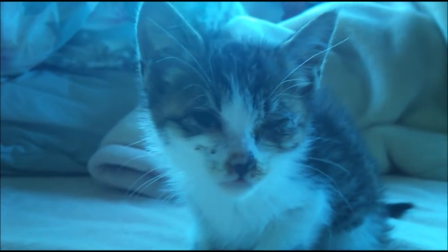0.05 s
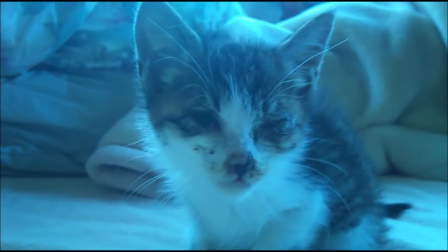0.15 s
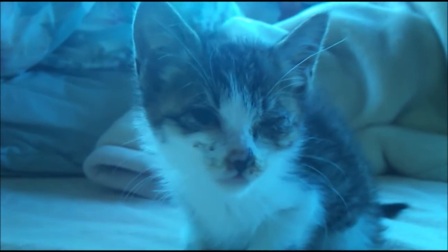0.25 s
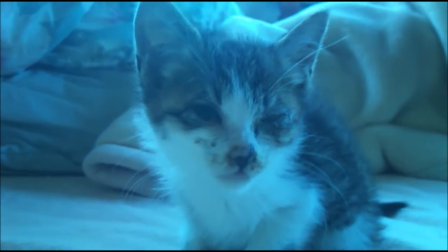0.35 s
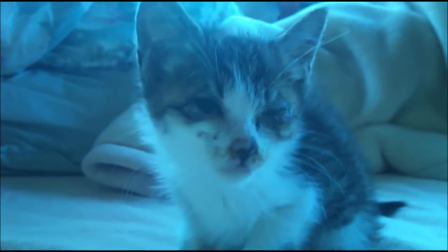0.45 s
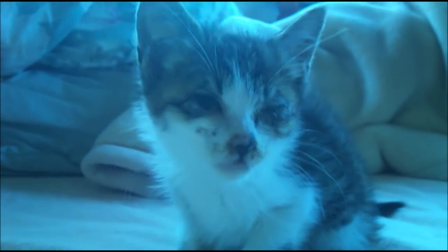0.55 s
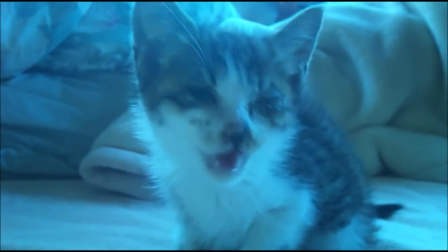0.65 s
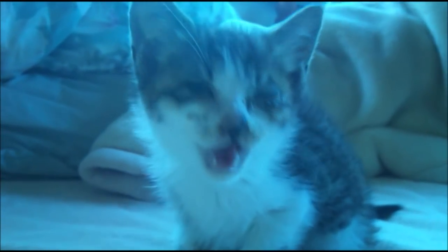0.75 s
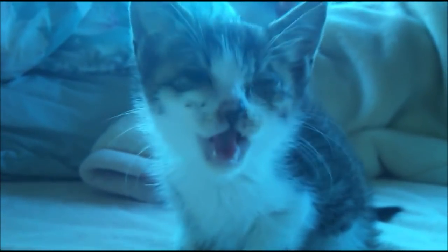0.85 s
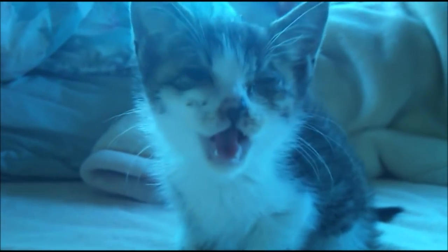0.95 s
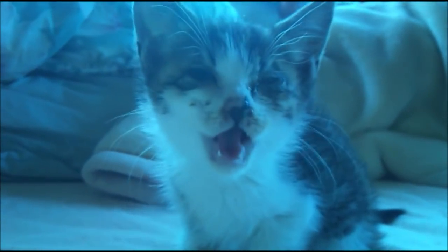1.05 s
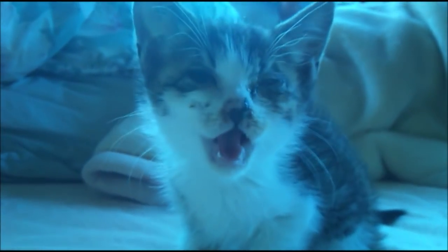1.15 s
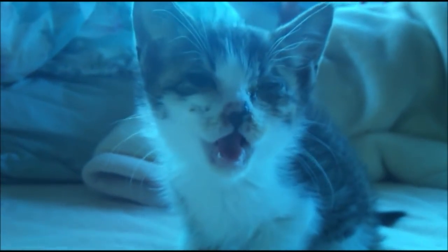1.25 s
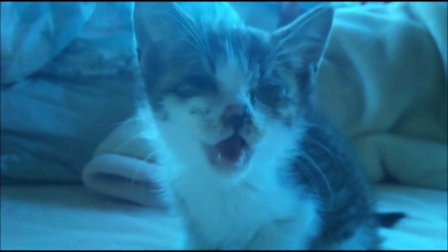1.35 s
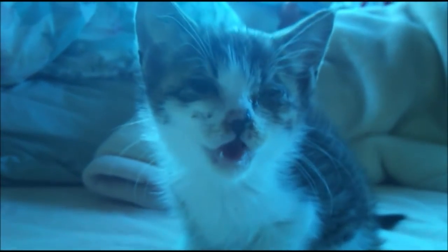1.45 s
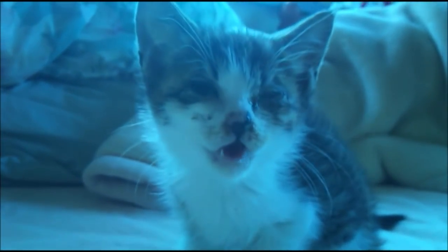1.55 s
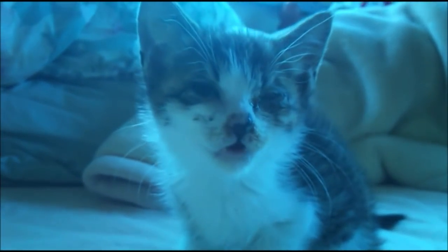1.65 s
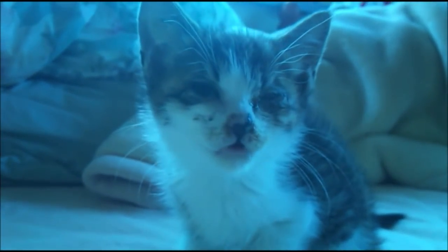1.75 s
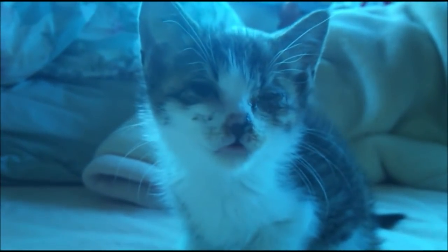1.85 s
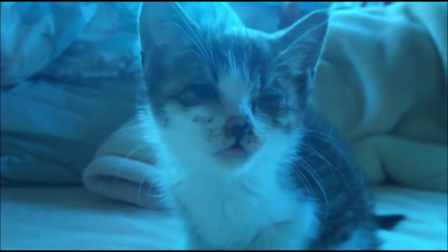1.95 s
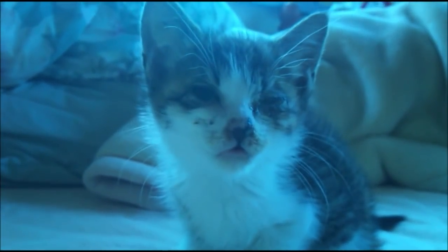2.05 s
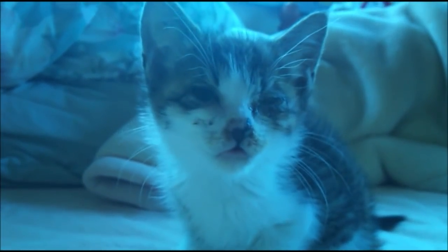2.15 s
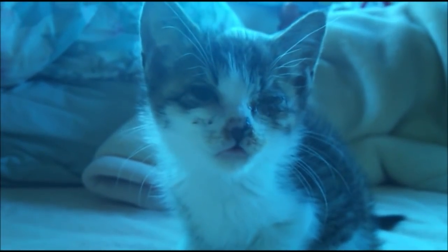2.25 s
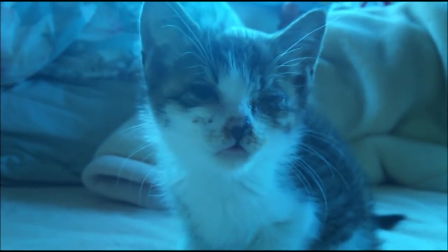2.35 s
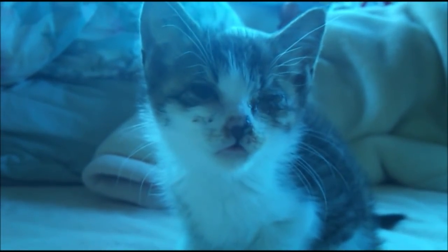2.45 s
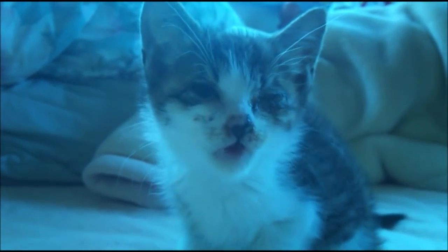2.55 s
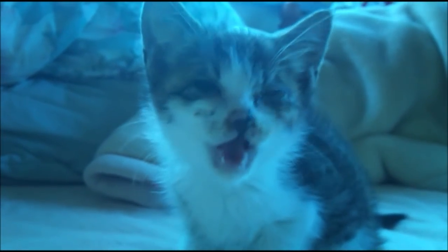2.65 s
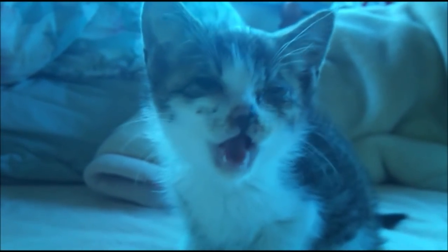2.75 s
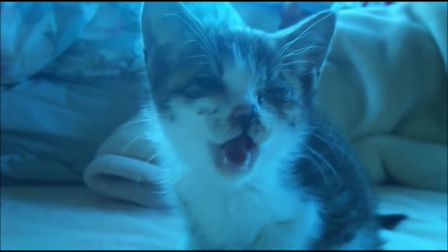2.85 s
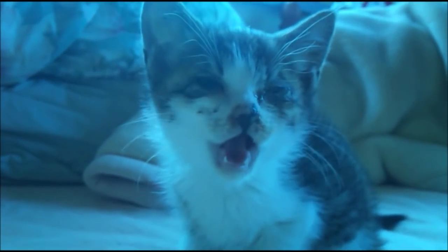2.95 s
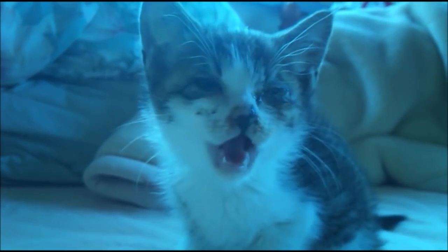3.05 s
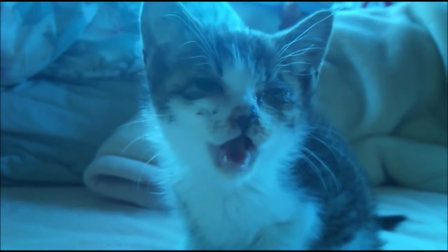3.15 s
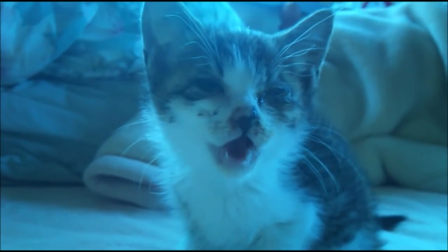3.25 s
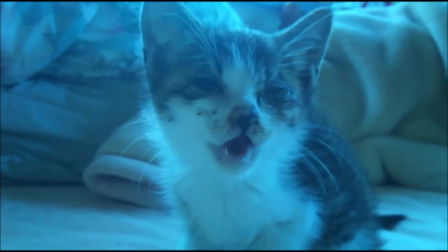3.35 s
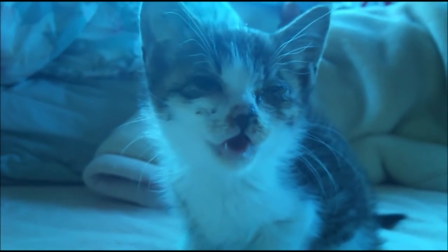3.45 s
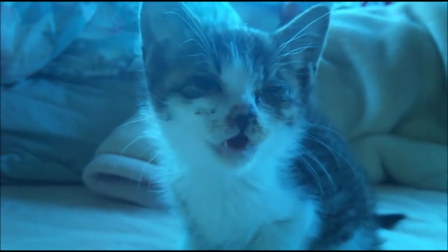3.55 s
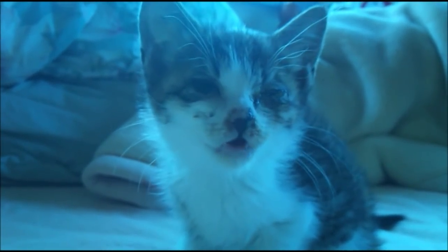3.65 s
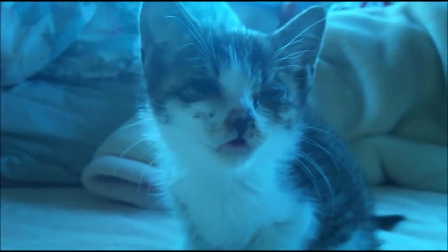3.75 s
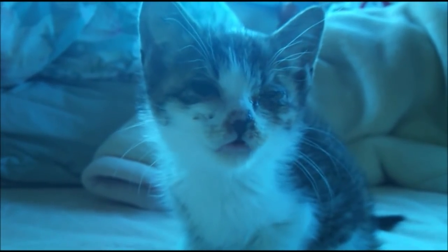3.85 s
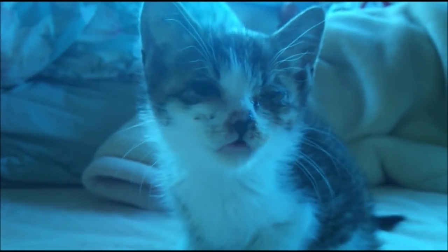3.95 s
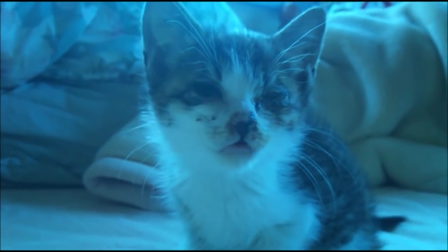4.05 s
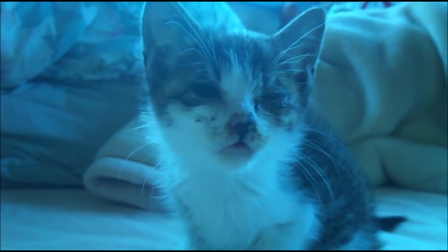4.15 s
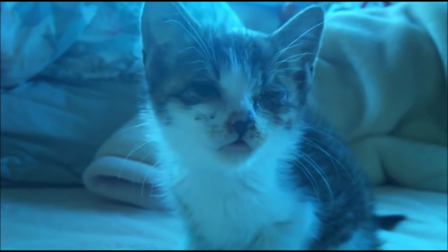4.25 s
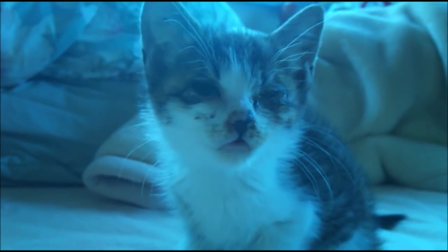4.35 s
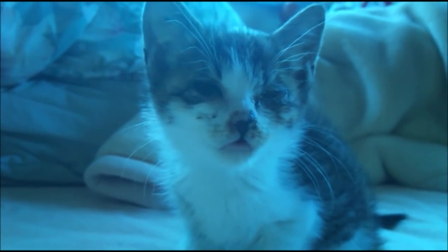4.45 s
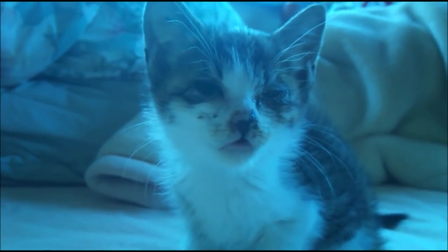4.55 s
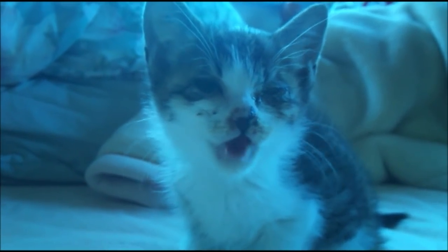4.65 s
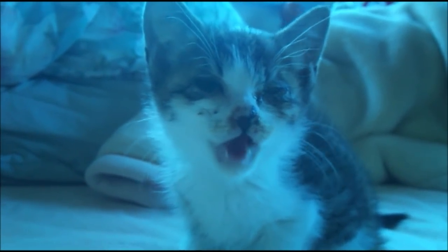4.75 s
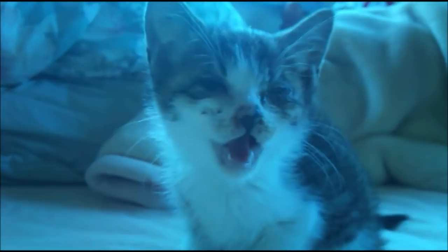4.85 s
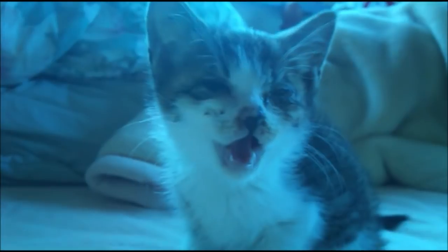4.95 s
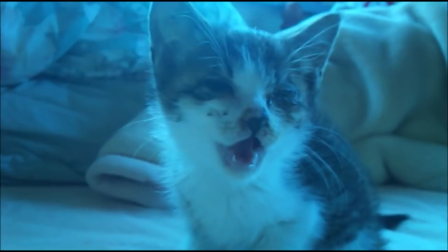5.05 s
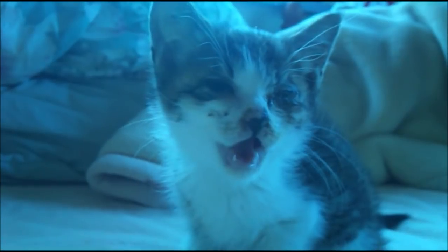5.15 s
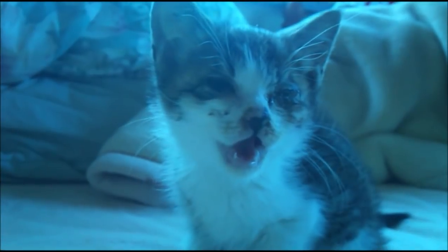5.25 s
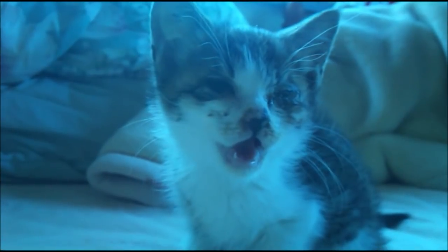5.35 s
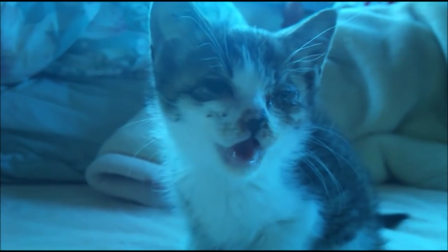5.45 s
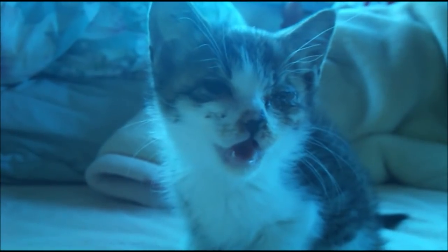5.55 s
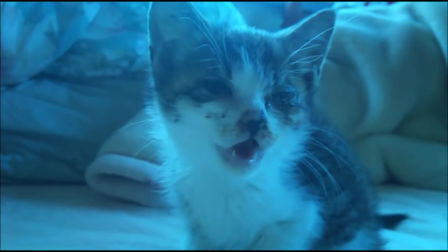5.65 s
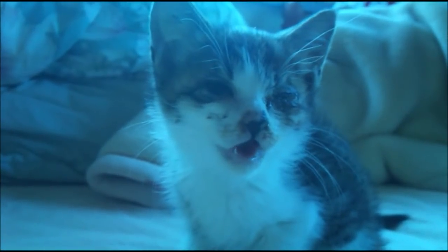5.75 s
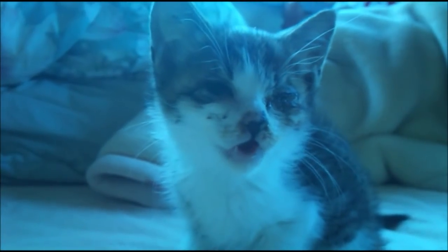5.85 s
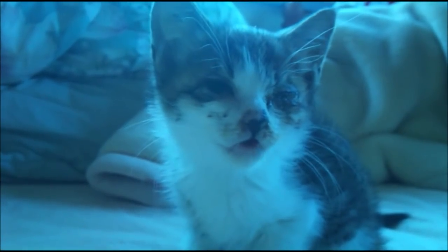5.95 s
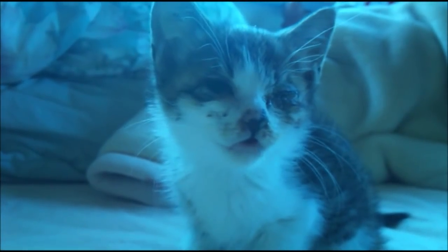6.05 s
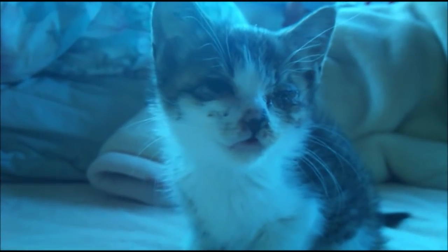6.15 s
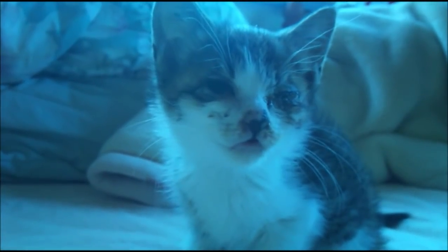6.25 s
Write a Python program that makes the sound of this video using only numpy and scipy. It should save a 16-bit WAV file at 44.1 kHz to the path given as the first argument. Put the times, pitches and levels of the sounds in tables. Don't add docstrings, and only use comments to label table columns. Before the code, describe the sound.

A young kitten close by gives three thin, drawn-out mews with long pauses, each cracking and flicking upward at its end, in a quiet room.

```python
import sys
import numpy as np
from scipy import signal
from scipy.fft import rfft, irfft
from scipy.io import wavfile
from scipy.ndimage import uniform_filter1d

SR = 44100
rng = np.random.default_rng(int(sys.argv[2]) if len(sys.argv) > 2 else 0)


def invert_db(level):
    return 10 ** (np.asarray(level, dtype=float) / 20)


def master(y):
    cut = np.clip(np.atleast_2d(y).T, -1, 1)
    pcm = np.round(cut * 32767)
    wavfile.write(sys.argv[1], SR, pcm.astype(np.int16))


N = 277389
STEP = 32

# (frequency [Hz], level [dB])
NOISE_COLOUR = [(18, -31.5), (30, -0.5), (64, -3), (382, -3), (941, -9.5), (1060, -8.5), (2430, -11.5),
                (3430, -14.5), (6720, -13), (7540, -22), (9800, -49), (16600, -120)]
# (frequency [Hz], level [dB rms])
LOW_HUM = [(42, -87.5)]
HISS_DB = -72


def hiss():
    hz, level_db = np.transpose(NOISE_COLOUR)
    bins_hz = np.arange(N // 2 + 1) * SR / N
    colour = invert_db(np.interp(np.log(bins_hz + 1), np.log(hz), level_db))
    noise = irfft(colour * rfft(rng.standard_normal(N)), N)
    t = np.arange(N) / SR
    hum = sum(invert_db(db + 3.5) * np.sin(2 * np.pi * hz * t) for hz, db in LOW_HUM)
    return invert_db(HISS_DB) * noise / noise.std() + hum


# (time [s], peak level [dB], frequency [Hz], decay by 60 dB [s])
CLICKS = [(.796, -54.5, 1310, .035), (1.7405, -51, 3600, .0052), (2.739, -55, 1295, .02),
          (4.106, -55.5, 864, .018), (4.731, -49.5, 1500, .013), (4.7313, -55, 2210, .0067),
          (4.7335, -37.5, 750, .0067), (4.808, -56.5, 984, .02), (4.817, -56, 3400, .02),
          (5.249, -52, 880, .022), (5.955, -54, 3800, .0071), (5.986, -48.5, 3600, .0065)]


def smacks():
    out, t = np.zeros(N), np.arange(2000) / SR
    onset = 1 - np.exp(-t / 0.00024)
    for s, peak_db, hz, t60 in CLICKS:
        at = round(s * SR)
        out[at:at + len(t)] += invert_db(peak_db - 60 * t / t60) * np.sin(2 * np.pi * hz * t) * onset
    return out


def drift(rate, size):
    r = np.exp(-2 * np.pi * rate * STEP / SR)
    chance = rng.standard_normal((size, N // STEP + 1001))
    slow = signal.lfilter([1], [1, -2 * r, r * r], chance)[:, 1000:]
    return slow / slow.std(axis=1, keepdims=True)


def in_steps(rows):
    s, *columns = np.transpose(rows)
    return [np.interp(np.arange(N // STEP + 1) * STEP / SR, s, c) for c in columns]


def in_samples(steps):
    return np.interp(np.arange(N) / STEP, np.arange(len(steps)), steps)


# (start time [s], attack [s], mouth ring level [dB], jaw slack [0-1])
STARTS = [
    (.797, 0.016, -1.5, 0.18),
    (2.734, 0.015, 8, 0.24),
    (4.812, 0.012, 0.5, 0.02),
]
# (time [s], pitch [Hz])
HELD_PITCH = [
    [(.812, 520), (.83, 517.3), (.888, 553.7), (.964, 567.5), (1.1, 555.1), (1.342, 555.3), (1.455, 566),
     (1.602, 546.4), (1.64, 546.6)],
    [(2.754, 413.2), (2.77, 461.5), (2.808, 473.5), (2.822, 511.3), (2.875, 542), (3.254, 545.1),
     (3.335, 557.7), (3.524, 534.4), (3.72, 565.4)],
    [(4.835, 473.7), (4.847, 507.6), (4.881, 504), (4.977, 542.4), (5.065, 561.8), (5.315, 572.8),
     (5.557, 549.5), (5.7, 546.3), (5.87, 556)],
]
# (time [s], level [dB], mouth opening [0-1], throat [Hz], mouth [Hz])
HELD_1 = [(0.82, -50.5, .1, 1039, 3470), (0.859, -49, .7, 1030, 3480), (.93, -47.5, 1, 1530, 3410),
          (1.02, -46, 1.09, 1520, 3310), (1.16, -47, 0.98, 1307, 3430), (1.27, -47.5, 0.97, 1273, 3370),
          (1.421, -49, 0.58, 1427, 3310), (1.57, -49.5, 0.16, 1239, 3140), (1.645, -50.5, .05, 1230, 3250)]
HELD_2 = [(2.762, -48.5, 0.65, 1230, 3350), (2.806, -42.5, 0.42, 1433, 3530),
          (2.822, -44.5, 0.46, 1220, 3340), (2.9, -46.5, 1.235, 1039, 2848),
          (3.01, -48.5, 1.08, 900.5, 2830), (3.251, -48.5, 0.8, 882, 2950),
          (3.341, -48.5, 0.37, 940.7, 3030), (3.449, -49, 0.026, 1363, 3350),
          (3.755, -52, -0.33, 1240, 3500)]
HELD_3 = [(4.838, -53, 0.58, 980, 3500), (4.918, -47.5, 0.81, 1000, 3524), (4.99, -49.5, 0.86, 1070, 3188),
          (5.091, -49, 0.97, 1230, 3135), (5.331, -51, 0.75, 1360, 3225), (5.45, -52, 0.58, 1400, 3037),
          (5.689, -50, 0.11, 1220, 3150), (5.781, -51.5, 0.085, 1330, 3103), (5.879, -51, 0.13, 1270, 3250)]
HELD = (HELD_1, HELD_2, HELD_3)
# (pitch jump [Hz], creep [Hz/s], slide middle [s], slide duration [s], top pitch [Hz])
TIGHTENING = [
    (27.75, 100, 1.69, .013, 715),
    (39.6, 2800, 3.77, .009, 885),
    (5, 1300, 5.941, .005, 810),
]
# (stop time [s], level [dB], throat [Hz], wait for puff [s], puff level [dB])
ENDINGS = [
    (1.71, -51.5, 1025, .06, -72),
    (3.792, -61, 945, .013, -65.5),
    (5.988, -65.5, 871, 0.012, -66.5),
]
# (time [s], air share [dB], pull [Hz])
LEAKS = [(.875, -20, 2), (.94, -22, 0), (.99, -23, 0), (1.088, -20, -3), (1.385, -20, 0), (1.49, -21, -3),
         (2.763, -13, 0), (2.812, -13, 0), (2.91, -27, 3), (2.968, -19, 0), (3.05, -23, -3),
         (3.285, -20, 3), (3.42, -24, -6), (3.48, -24, 7), (3.57, -16, 0), (3.69, -10, 0), (3.745, -11, 30),
         (4.875, -21, 0), (4.94, -20, 0), (5.013, -23, -14), (5.13, -24, -3), (5.19, -19, -5),
         (5.35, -20, -7), (5.49, -17, 4), (5.69, -18, 0), (5.73, -8, 0), (5.79, -7, 6), (5.845, -10, 0)]
CHEST_HZ = 520
ONSET_SHARP, ONSET_SHARP_S = .15, 0.0077
CLEAR_AIR_DB, SHUT_AIR_DB = -28, 8.5
ONSET_AIR_DB, ONSET_AIR_DB_PER_S = -3, -520
CATCH_DB_PER_S, PULL_S = 300, 0.022
HALF_UNDER_AIR_DB = -17
BREAK_AIR_DB, PUFF_AIR_DB = -5, 8
BREAK_HALF_DB, TIGHT_HALF_DB, TIGHT_HZ = 1, -12, 760
TOP_RISE_HZ_PER_S = 1300


def folds():
    t = np.arange(N // STEP + 1) * STEP / SR
    pitch, half_db, air_db = np.zeros((3, len(t)))
    caught_db = np.max([db - CATCH_DB_PER_S * abs(t - s) for s, db, _ in LEAKS], axis=0)
    pull = sum(hz * np.exp(-((t - s) / PULL_S) ** 2) for s, _, hz in LEAKS)
    for call, curve, held, slide_row, ending in zip(STARTS, HELD_PITCH, HELD, TIGHTENING, ENDINGS):
        start, end, break_s = call[0], ending[0], held[-1][0]
        jump, creep, middle, slide, top_hz = slide_row
        since, now = np.maximum(t - start, 0), t > start - .7
        clear_db = CLEAR_AIR_DB + SHUT_AIR_DB * (1 - in_steps(held)[1])
        onset_db = ONSET_AIR_DB + ONSET_AIR_DB_PER_S * since
        leak_db = np.max([clear_db, caught_db, onset_db], axis=0)
        broken = np.clip((t - break_s) / .012 + 1, 0, 1)
        stopped = np.clip((t - end) / .01, 0, 1)
        hz = in_steps(curve)[0] * (1 + ONSET_SHARP * np.exp(-(since / ONSET_SHARP_S) ** 2))
        hz = hz + pull + jump * broken + creep * np.clip(t - break_s, 0, .1)
        tight = (1 + np.tanh((t - middle) / slide)) / 2
        tight_hz = top_hz + TOP_RISE_HZ_PER_S * np.clip(t - middle, 0, .1)
        hz = hz + (tight_hz - hz) * tight
        doubled_db = np.interp(hz, [TIGHT_HZ - 40, TIGHT_HZ + 40], [BREAK_HALF_DB, TIGHT_HALF_DB])
        held_half_db = np.minimum(leak_db + HALF_UNDER_AIR_DB, -24)
        call_half_db = held_half_db + broken * (doubled_db - held_half_db)
        call_air_db = leak_db + broken * (BREAK_AIR_DB - leak_db) + stopped * (PUFF_AIR_DB - BREAK_AIR_DB)
        pitch[now], half_db[now], air_db[now] = hz[now], call_half_db[now], call_air_db[now]
    pitch[pitch == 0] = CHEST_HZ
    return pitch, half_db, air_db


# (time [s], lip spread [0-1], lip resonance [Hz], tongue drop [0-1])
LIPS_TONGUE = [
    [(.822, 0.22, 4510, .55), (.88, 0.77, 4600, .55), (.975, 1.01, 4520, 0.5), (1.03, 0.65, 4590, .45),
     (1.42, 0.57, 4600, 0.49), (1.57, 0.45, 4060, .45), (1.64, 0.08, 4250, .35)],
    [(2.76, 1.01, 4530, .38), (2.78, 0.62, 4730, 0.3), (2.808, 0.8, 4390, 0.1), (2.83, .4, 4550, 0.63),
     (2.93, 0.93, 4180, 0.53), (3.1, 0.99, 4150, 0.52), (3.27, 0.48, 4450, 0.59), (3.47, 0.35, 4440, 0.48),
     (3.62, -.6, 4520, 0.63)],
    [(4.845, .3, 4600, 0.5), (4.89, 0.09, 4490, 0.6), (4.93, 0.54, 4650, 0.6), (5.08, 0.79, 4560, 0.49),
     (5.33, 0.63, 4510, 0.3), (5.48, 0.56, 4380, .5), (5.7, 0.33, 4020, 0.5), (5.87, 0.25, 4040, 0.4)],
]
# chest, mouth, lips [dB]
BREAK_UNDER_DB = [-10, -16, -28.5]
# chest, mouth, lips [dB]
STOP_UNDER_DB = [-30, -24, -18]
BREAK_HOLDS, BREAK_SAG_DB = 0.6, -3.5
ATTACK_DB, ATTACK_BRIGHT_DB = -30, -9
CHEST_DB, CHEST_SAG_DB = -8.5, -5
MOUTH_SHUT_DB, MOUTH_OPENS_DB, LIPS_SHUT_DB, LIPS_OPENS_DB = -15, 17, -20, 20
JAW_SHUT, JAW_OPENS, JAW_EARLY = 0.018, 0.59, 0.38
CUT_S, CUT_DB, CUT_HZ = .009, [-83.5, -68.5, -91, -85], [3400, 4200]
PUFF_S, PUFF_DB, PUFF_HZ = .064, [-83, -72.5, -83], [3500, 4270]
PUFF_END_DB, PUFF_END_HZ = [-94, -77, -89, -94], [1135, 3335, 4210]
TONGUE_REST = .55


def call_rows(call, held, lips, stop):
    start, attack, mouth_ring_db, slack = call
    end, end_db, end_hz, wait, puff_db = stop
    s, *held = np.transpose(held)
    lip_s, spread, lip_hz, tongue = np.transpose(lips)
    moments = np.union1d(s, np.clip(lip_s, s[0], s[-1]))
    held = np.transpose([moments, *[np.interp(moments, s, column) for column in held]])
    attack_end = min(start + attack, held[0, 0] - .001)
    held = np.vstack([[start, *held[0, 1:]], [attack_end, *held[0, 1:]], held])

    s, level_db, opening, throat, mouth = held.T
    level_db = level_db + ATTACK_DB * (s == start)
    upper_db = level_db + ATTACK_BRIGHT_DB * (s < held[2, 0])
    spent = (s - start) / (s[-1] - start)
    chest_db = level_db + CHEST_DB + CHEST_SAG_DB * spent
    mouth_db = upper_db + mouth_ring_db + MOUTH_SHUT_DB + MOUTH_OPENS_DB * opening
    lips_db = upper_db + LIPS_SHUT_DB + LIPS_OPENS_DB * np.interp(s, lip_s, spread)
    jaw = slack + JAW_SHUT + JAW_OPENS * opening + JAW_EARLY * (1 - spent)
    rows = np.transpose([s, chest_db, level_db, throat, mouth_db, mouth,
                         lips_db, np.interp(s, lip_s, lip_hz), jaw])

    holds_db = level_db[-1] + BREAK_SAG_DB
    hold_s = s[-1] + BREAK_HOLDS * (end - s[-1])
    hold_hz = throat[-1] + BREAK_HOLDS * (end_hz - throat[-1])
    chest, mid, lip = holds_db + np.array(BREAK_UNDER_DB)
    chest_end, mid_end, lip_end = end_db + np.array(STOP_UNDER_DB)
    puff_s = end + max(wait, CUT_S + .001)
    tail = [(hold_s, chest, holds_db, hold_hz, mid, CUT_HZ[0], lip, CUT_HZ[1], JAW_SHUT),
            (end, chest_end, end_db, end_hz, mid_end, CUT_HZ[0], lip_end, CUT_HZ[1], JAW_SHUT),
            (end + CUT_S, *CUT_DB[:2], end_hz, CUT_DB[2], CUT_HZ[0], CUT_DB[3], CUT_HZ[1], .5),
            (puff_s, *PUFF_DB[:2], end_hz, puff_db, PUFF_HZ[0], PUFF_DB[2], PUFF_HZ[1], .5),
            (end + wait + PUFF_S, *PUFF_END_DB[:2], PUFF_END_HZ[0], PUFF_END_DB[2], PUFF_END_HZ[1],
             PUFF_END_DB[3], PUFF_END_HZ[2], .5)]
    rows = np.vstack([rows, tail])
    rest_s = max(s[-1], lip_s[-1]) + .02
    return np.column_stack([rows, np.interp(rows[:, 0], [*lip_s, rest_s], [*tongue, TONGUE_REST])])


WIDTHS_HZ = [260, 380, 380, 450]


def tract():
    calls = [call_rows(*parts) for parts in zip(STARTS, HELD, LIPS_TONGUE, ENDINGS)]
    chest_db, throat_db, throat, mouth_db, mouth, lips_db, lips, jaw, tongue = in_steps(np.vstack(calls))
    calling = 0
    for rows in calls:
        first, last = rows[0][0], rows[-1][0]
        calling = calling + in_steps([(first - .004, 0), (first, 1), (last, 1), (last + .02, 0)])[0]
    gains = calling * invert_db(np.array([chest_db, throat_db, mouth_db, lips_db]))
    centres = np.array([CHEST_HZ + 0 * jaw, throat, mouth, lips])
    fixed = 0 * jaw + .5
    spread = np.exp(2 * (np.clip([fixed, jaw, tongue, fixed], -.2, 1.2) - .5))
    return gains, centres, np.array(WIDTHS_HZ)[:, None] * spread


def breath(gains, centres, gate):
    out = 0
    for gain, centre, width_hz in zip(gains, centres, WIDTHS_HZ):
        low_pass = signal.butter(2, 1.1 * width_hz, fs=SR, output="sos")
        band = signal.sosfilt(low_pass, gate * rng.standard_normal((2, N)))
        turn = np.cumsum(2 * np.pi * in_samples(centre) / SR)
        ringing = band[0] * np.cos(turn) + band[1] * np.sin(turn)
        out = out + in_samples(gain) * ringing / band.std()
    return out


# chest, throat, mouth, lips [dB]
AIR_TILT = [-22, -8, 0, 0]
CATCH_SHIMMER_DB, CATCH_JITTER = 2.2, 1.5


def voice(shimmer_db, flutter_db, jitter, skew):
    gains, centres, widths = tract()
    pitch, half_db, air_db = folds()
    unrest = np.clip((air_db + 32) / 14, 0, 1.5)
    pitch = pitch * (1 + jitter * (1 + CATCH_JITTER * unrest) * drift(83, size=1)[0])
    air = np.clip(invert_db(air_db + np.array(AIR_TILT)[:, None]), 0, 1)

    order = np.arange(1, 29)[:, None]
    partial_hz = order * pitch / 2
    steady_db = shimmer_db * np.sqrt(order / 8) * drift(9, size=28)
    catch_db = CATCH_SHIMMER_DB * np.minimum(unrest, 1) * np.sqrt(order / 12) * drift(40, size=28)
    source = np.where(order % 2, invert_db(half_db), 1) * invert_db(steady_db + catch_db)
    source = source / (1 + (partial_hz / 7300) ** 6)
    source = source * invert_db(flutter_db * drift(45, size=1)) * np.exp(1j * skew * order ** 2)

    chest_pass = 1 / (1 + (CHEST_HZ / partial_hz) ** 4)
    upper_pass = 1 / (1 + (720 / partial_hz) ** 8)
    partials = 0
    for k, (gain, centre, width) in enumerate(zip(gains, centres, widths)):
        resonance = 1 / (1 + 1j * (partial_hz - centre) / width) ** 2
        shape = source * (upper_pass if k else chest_pass) * resonance
        rms = np.sqrt(np.sum(abs(shape) ** 2, axis=0) / 2)
        partials = partials - (-1) ** k * gain * np.sqrt(1 - air[k] ** 2) * shape / rms

    phase = np.cumsum(np.pi * in_samples(pitch) / SR)
    tone = 0
    for n, p in zip(order[:, 0], partials):
        tone = tone + in_samples(p.real) * np.cos(n * phase) - in_samples(p.imag) * np.sin(n * phase)
    return tone + breath(gains * air, centres, 1 + .9 * np.cos(2 * phase))


def room(x):
    t60_s, level_db = .3, -28
    t = np.arange(SR // 3) / SR
    dull = signal.lfilter([1], [1, -.6], rng.standard_normal(len(t)))
    tail = dull * invert_db(-60 * t / t60_s) * (t > .004)
    return invert_db(level_db) * signal.fftconvolve(x, tail / np.sqrt(np.sum(tail ** 2)))[:N]


def scene():
    kitten = voice(shimmer_db=1.0, flutter_db=.61, jitter=.002, skew=0.048) + smacks()
    return (kitten + room(kitten) + hiss())[None]


# (time [s], threshold rise [dB])
DROPOUTS = [(.21, 15), (.42, 15), (1.0, 19), (1.4, 13), (1.447, 22), (2.13, 16), (3.405, 14), (4.42, 17),
            (4.49, 15), (4.6, 17), (5.005, 14)]
# (frequency [Hz], level per bin [dB])
QUIET_THRESHOLD = [(60, -114), (150, -106), (400, -100), (900, -102), (2400, -109), (5500, -113),
                   (6500, -111)]


def starve(x, near_db, far_share, patchy_db):
    hz, s, lines = signal.stft(x, SR, window="cosine", nperseg=1024)
    power = abs(lines) ** 2 + 1e-16
    near = 10 * np.log10(uniform_filter1d(power, size=25, axis=0)) + near_db
    total = signal.lfilter([.3], [1, -.7], 10 * np.log10(power[3:].sum(axis=0)) + 60)
    far = np.interp(hz, *np.transpose(QUIET_THRESHOLD))[:, None] + far_share * np.maximum(total, 0)
    patches = uniform_filter1d(rng.standard_normal((65, len(s))), size=4, axis=1)
    patches = np.repeat(patches, 8, axis=0)[:len(hz)]
    rise = sum(rise_db * np.exp(-((s - at) / .008) ** 2) for at, rise_db in DROPOUTS)
    threshold = 10 * np.log10(invert_db(2 * near) + invert_db(2 * far)) + 2 * patchy_db * patches + rise
    level = 10 * np.log10(uniform_filter1d(power, size=3, axis=0))
    keep = 1 / (1 + invert_db(4 * (threshold - level)))
    return signal.istft(lines * keep, SR, window="cosine", nperseg=1024)[1][:N]


def top_cut(x):
    return signal.sosfilt(signal.butter(12, 7690, fs=SR, output="sos"), x)


def record(dry):
    thinned = starve(dry[0], near_db=-36, far_share=.7, patchy_db=2.5)[None]
    return top_cut(thinned - .0003)


dry = scene()
out = record(dry)
master(out)
```